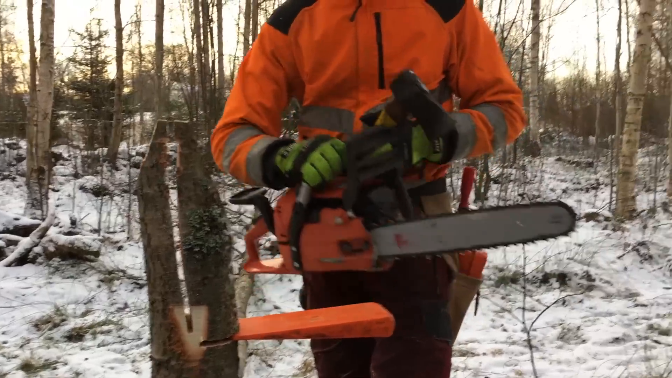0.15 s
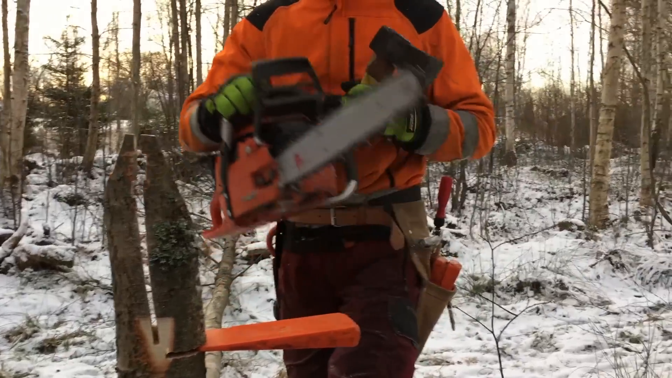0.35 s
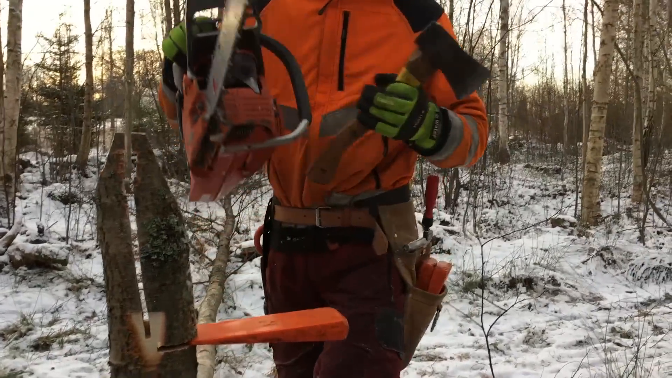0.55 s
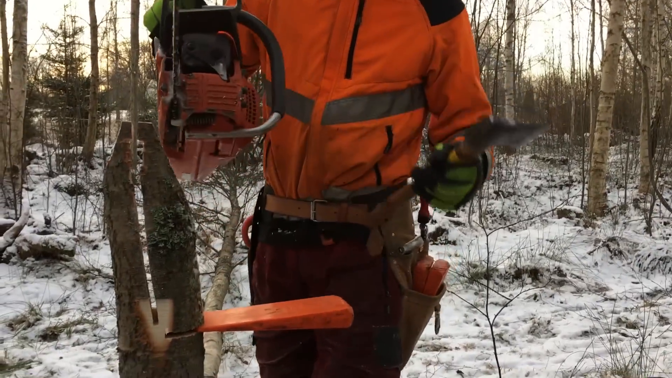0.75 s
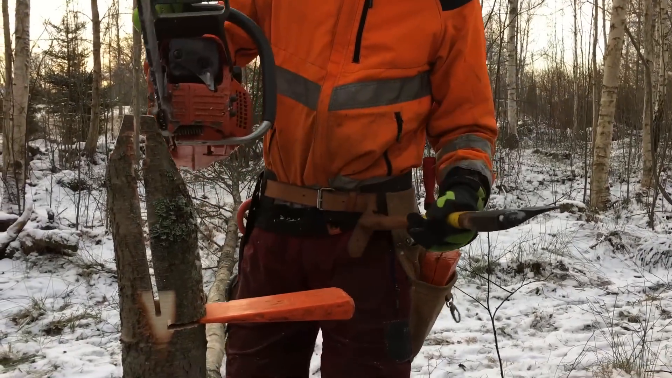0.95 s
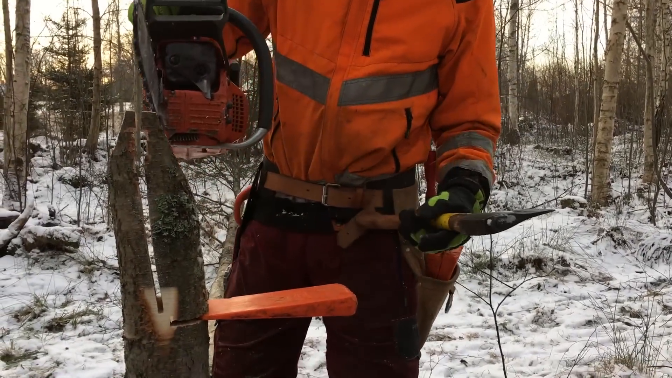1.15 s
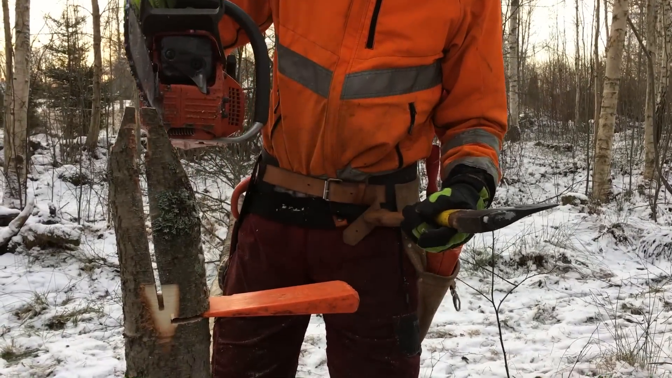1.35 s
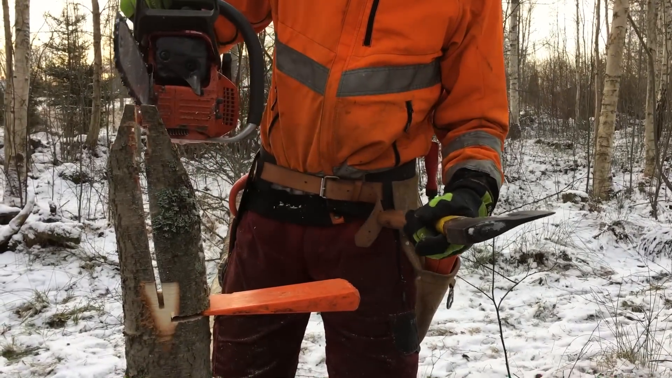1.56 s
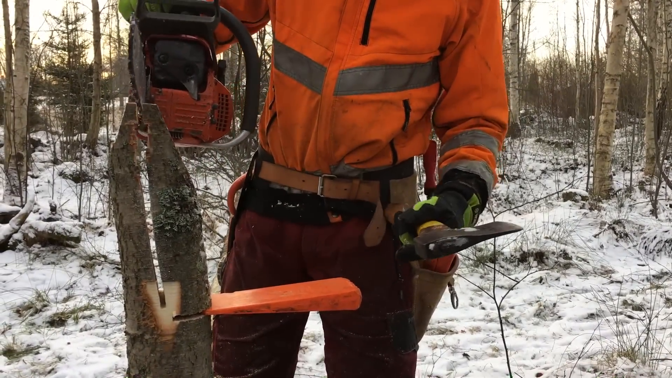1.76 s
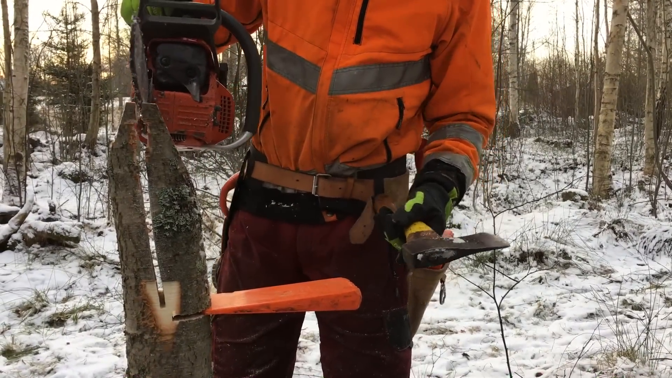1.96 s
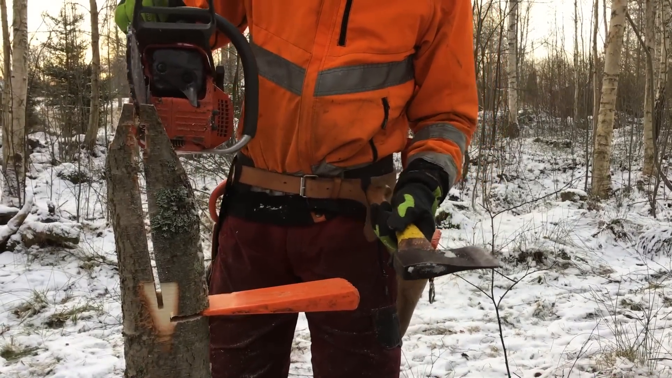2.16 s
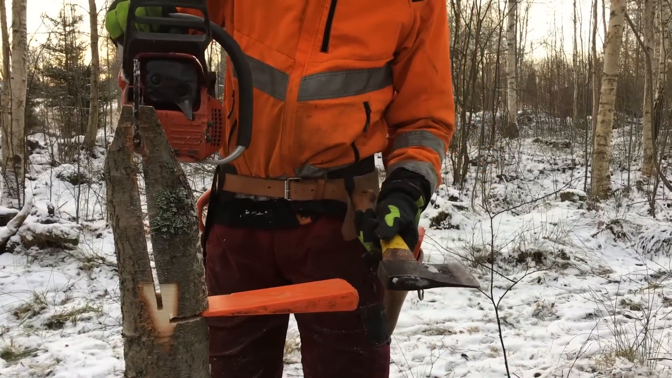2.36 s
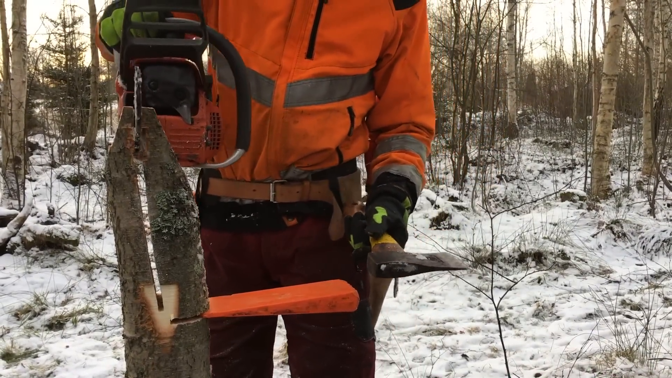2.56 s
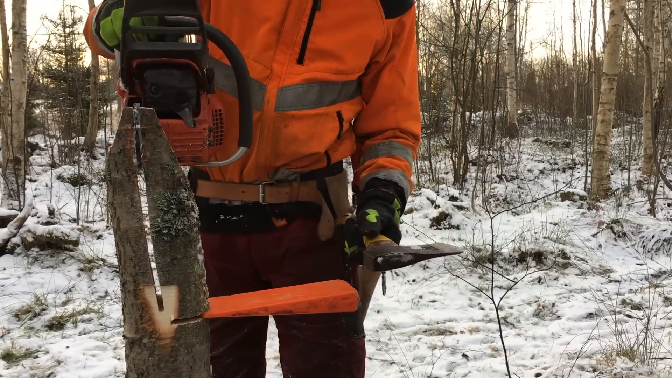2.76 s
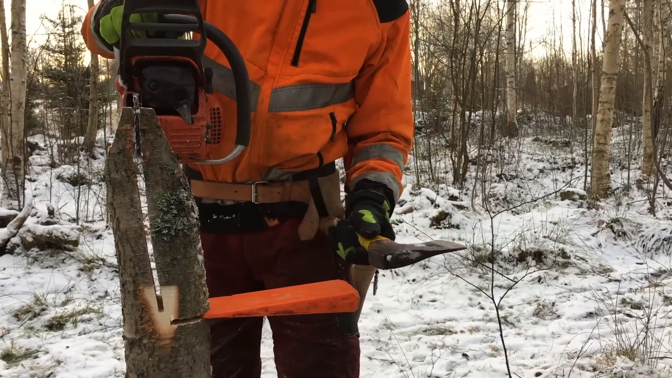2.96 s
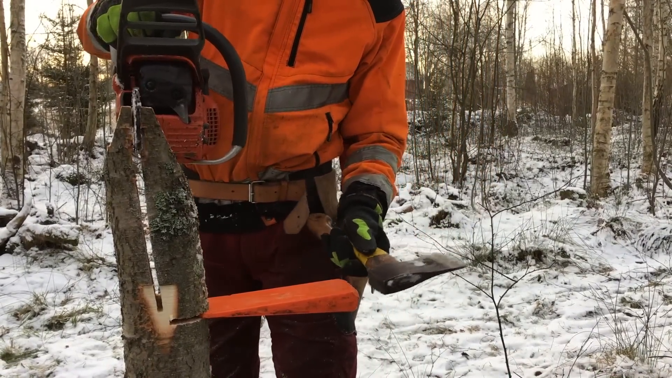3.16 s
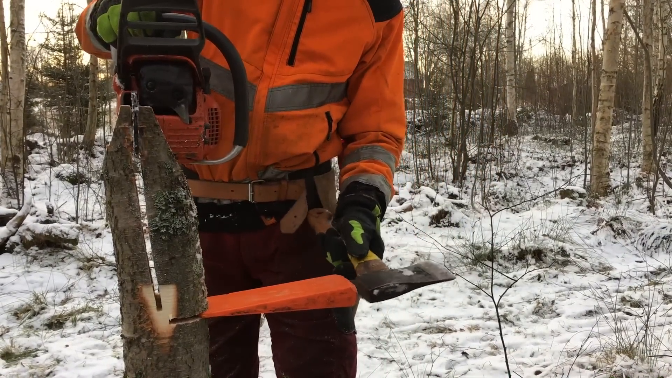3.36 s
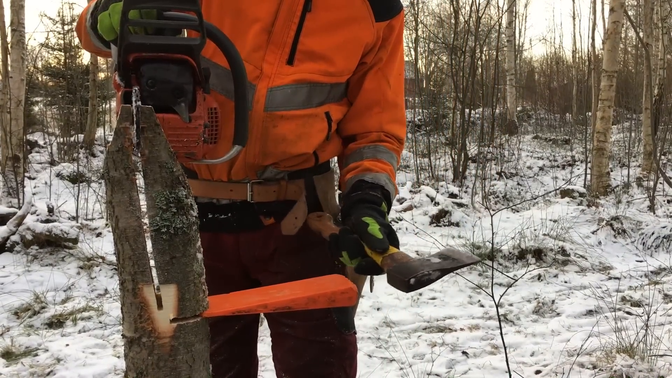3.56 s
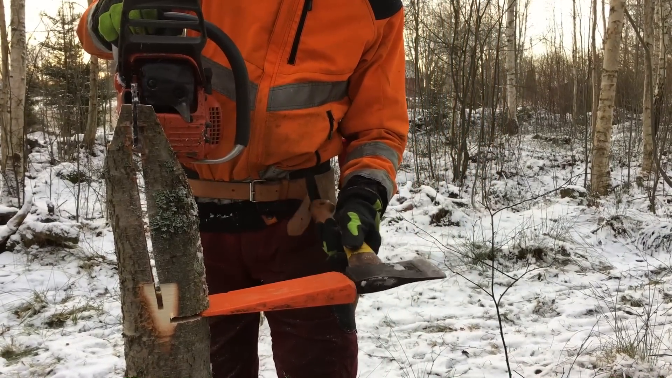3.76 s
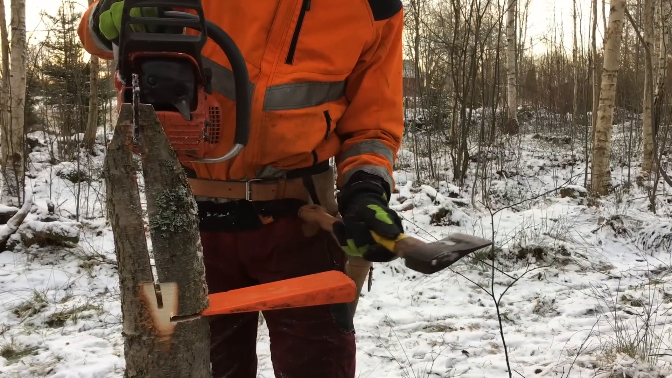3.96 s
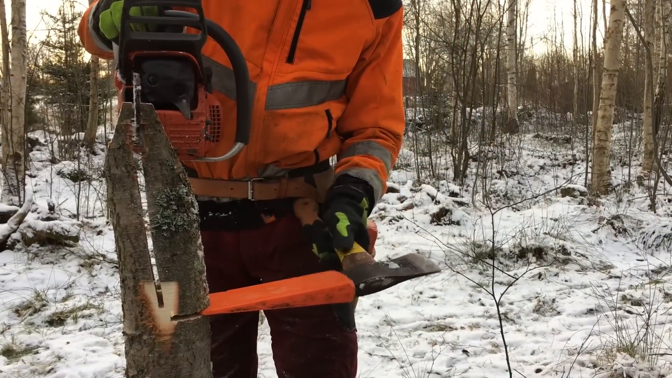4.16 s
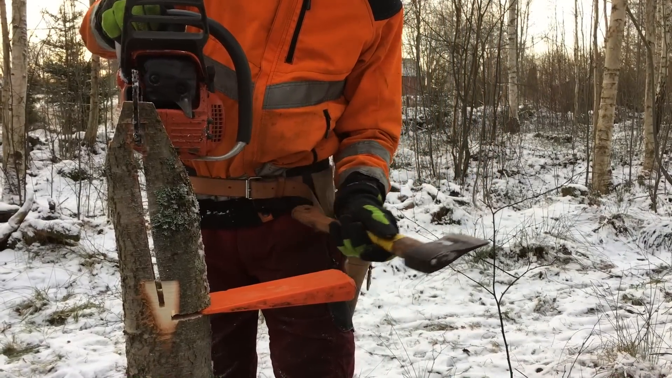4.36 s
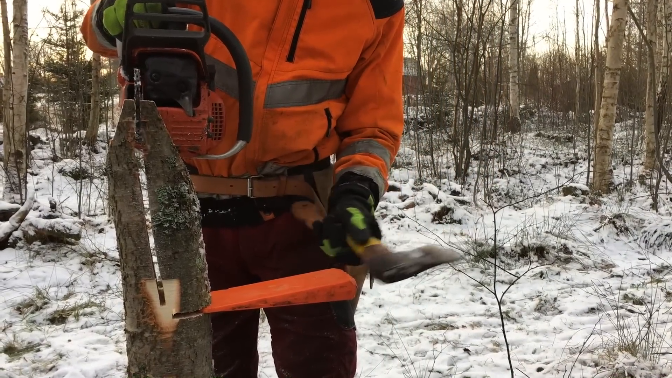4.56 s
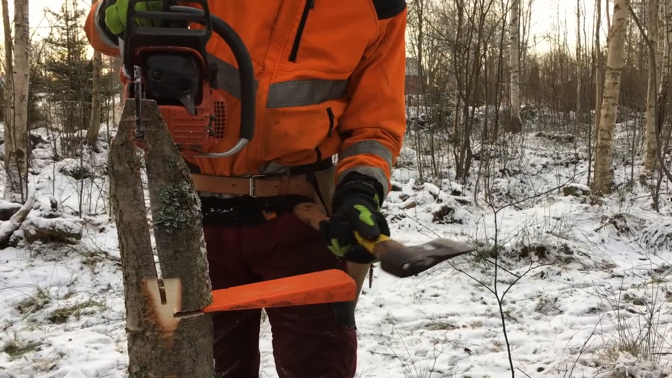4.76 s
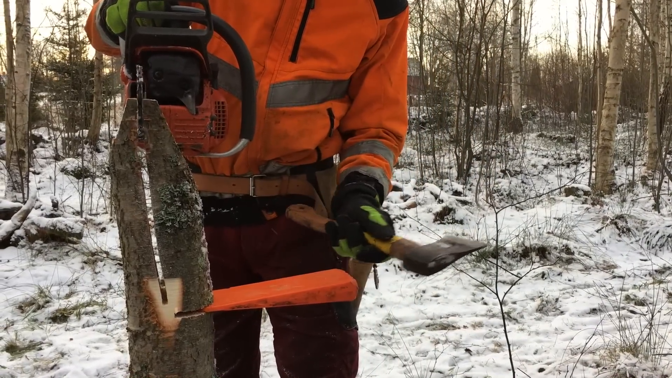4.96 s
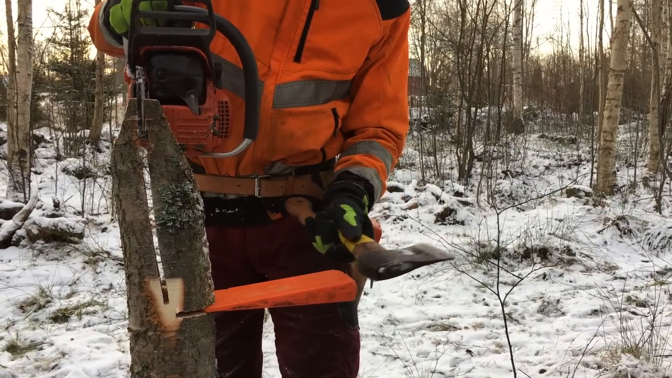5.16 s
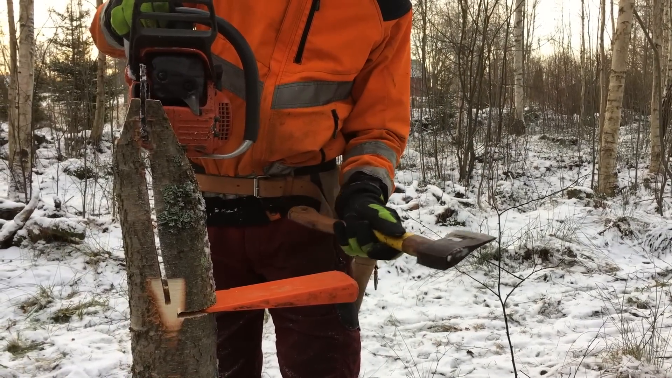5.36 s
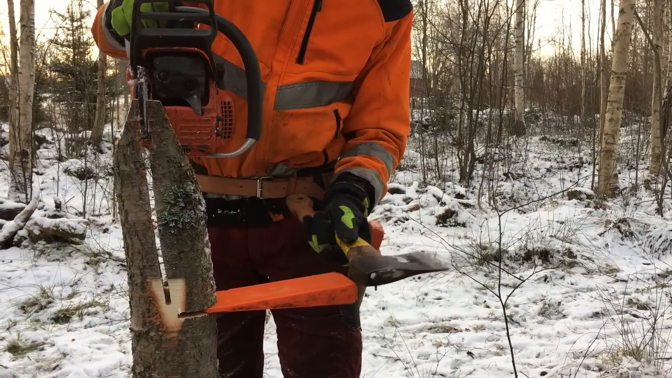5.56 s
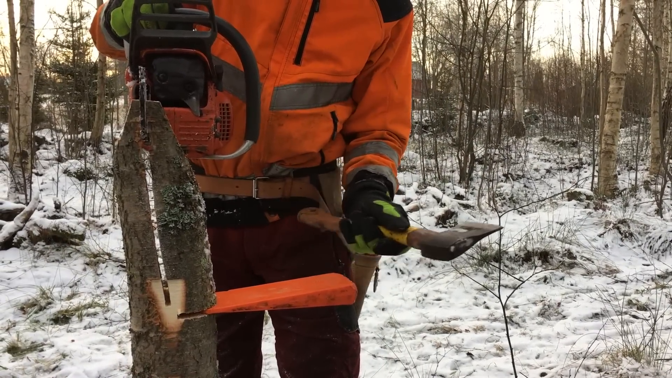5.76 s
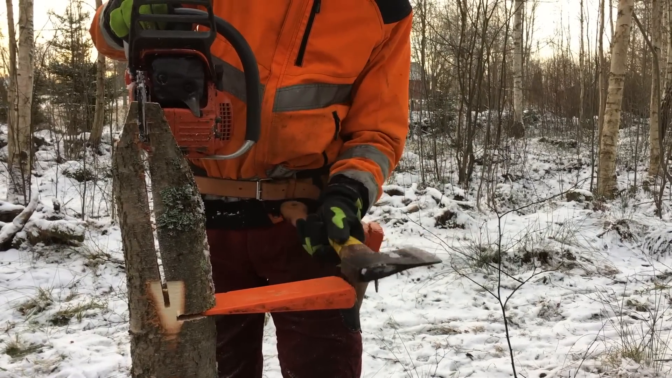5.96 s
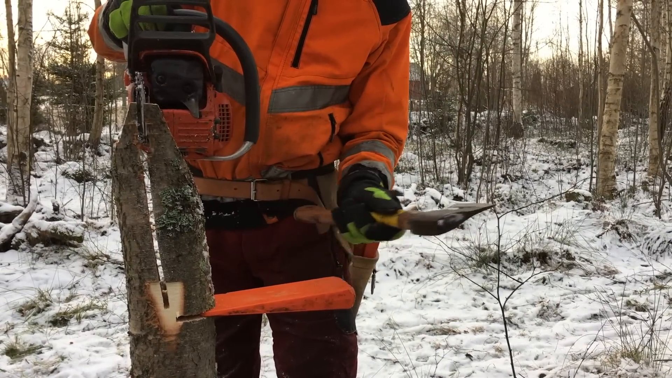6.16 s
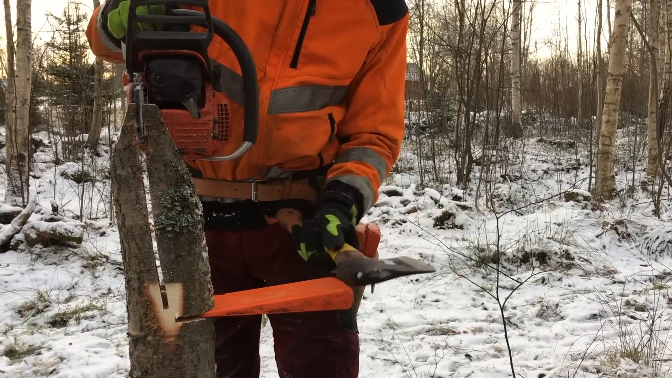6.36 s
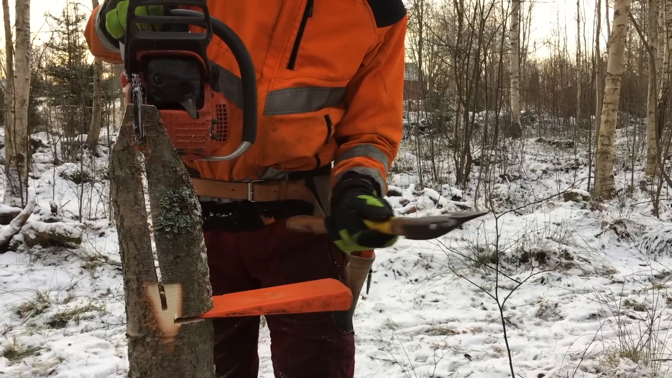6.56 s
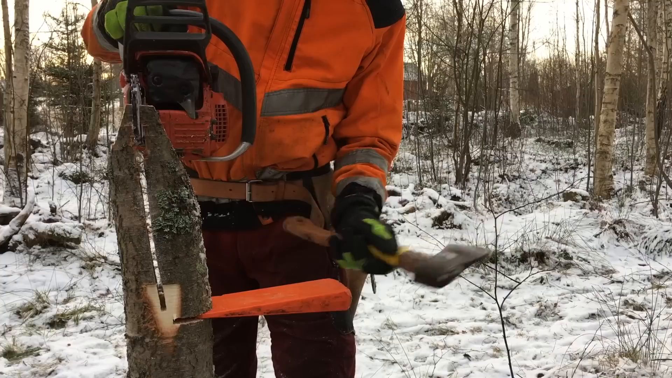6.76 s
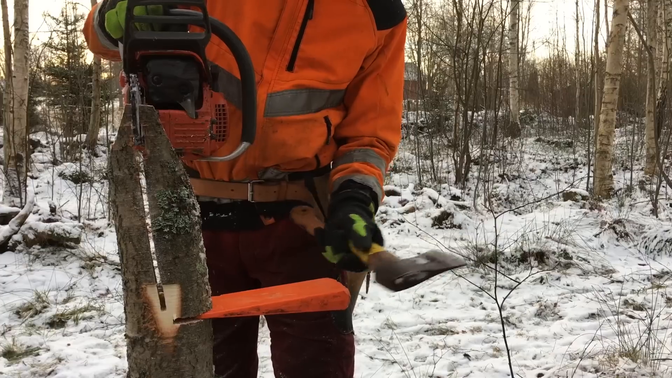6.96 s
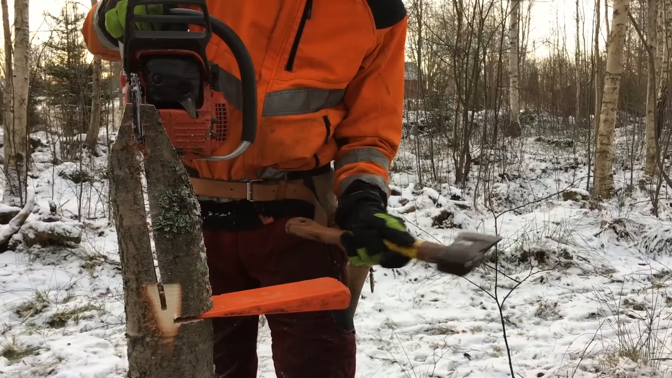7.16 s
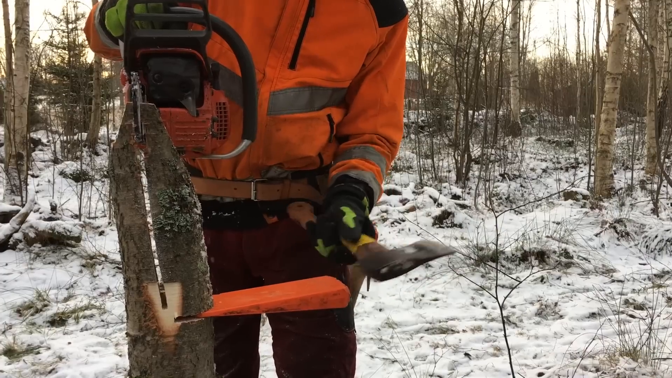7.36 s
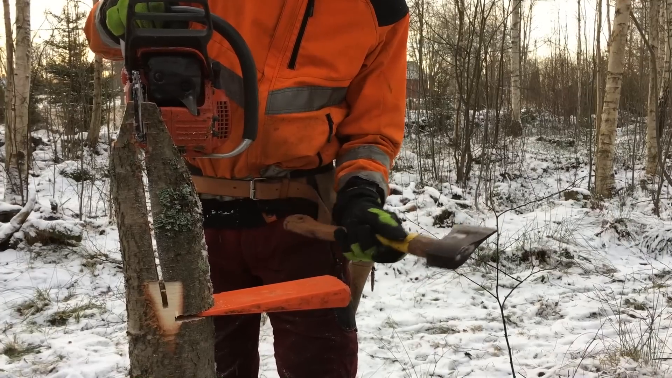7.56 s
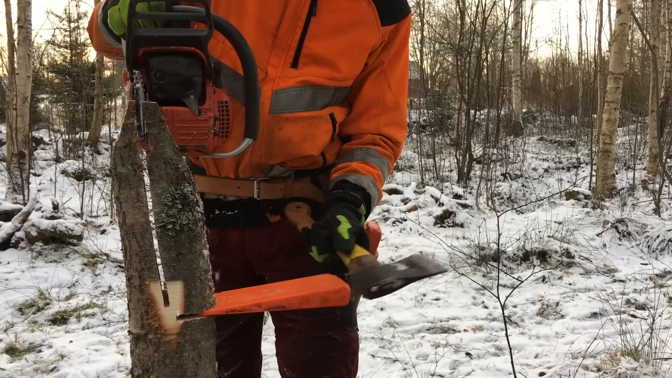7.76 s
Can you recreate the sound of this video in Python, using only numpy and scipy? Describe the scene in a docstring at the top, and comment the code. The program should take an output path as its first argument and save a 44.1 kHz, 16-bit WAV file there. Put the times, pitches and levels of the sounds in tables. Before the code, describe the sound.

Over faint rumble and air hiss, stiff cloth rustles and tools clatter, then settle into small ticks and soft low bumps. Steady hammering follows: eleven dry, bright knocks of steel on a plastic wedge, each with a choked knocky ring, woody body, low thump and quick echo off the trees. Blows grow stronger, with small rebound clicks between; the nearby microphone clips on the hardest.

```python
"""Blow after blow, the back of an axe drives a plastic wedge into a split trunk in a snowy forest: decaying
modes of wedge, wood and steel, a crack of shaped noise, a low bloom and a late ground thump.
Echoes off the trees are banded decaying noise; the hardest blows overload the input and clip.
Before that a worker shifts a silent chainsaw and an axe: clacks are damped modes, gear ticks are resonant
noise bursts, the jacket rustles as grainy filtered noise, all over a faint rumble and hiss of air."""
import sys
import numpy as np
from scipy import signal
from scipy.fft import rfft, irfft
from scipy.io import wavfile
from scipy.ndimage import uniform_filter1d

SR = 44100
rng = np.random.default_rng(int(sys.argv[2]) if len(sys.argv) > 2 else 0)


def wav_record(signal):
    """Record a signal, one row per channel, as 16-bit PCM in the file named by sys.argv[1]."""
    frames = np.transpose(np.atleast_2d(signal))
    bounded = np.clip(frames, -1, 1)
    # unit amplitude maps onto the largest positive 16-bit level
    quanta = np.round(bounded * 32767).astype(np.int16)
    wavfile.write(sys.argv[1], SR, quanta)


N = 344421

# axe on wedge: (time [s], force [dB], wedge pitch [Hz], its ring [dB], second wedge pitch [Hz], its ring [dB],
#                ring choked after [s], trunk ring [dB], low bloom [dB], bloom pitch [Hz], ground thump [dB],
#                saw bar ring [dB])
BLOWS = [(3.333, -15, 1192, -10, 1470, -6.5, 0.011, -12.5, -27.5, 343, -16.5, -57),
         (3.809, -10, 1440, -4, 1257, -13, 0.013, -10.5, -26, 284, -13, -62),
         (4.25, -5.5, 1430, 3, 1170, -1.5, 0.0066, -1.5, -22, 179.8, -9.5, -60),
         (4.699, -3.5, 1236, -10, 1548, -3, 0.01, -6, -22.5, 292, -9.5, -60),
         (5.14, -3.5, 1360, 5, 1560, -11, 0.0077, -14.5, -21, 304, -6, -37),
         (5.579, -1, 1477, 5, 1328, 6.5, 0.012, -10, -21, 308, -10.5, -58),
         (6.006, 1.5, 1478, 4.5, 1325, 0.5, 0.0085, -10.5, -15.5, 269, -16, -32.5),
         (6.46, -1.5, 1534, 6.5, 1406, 2, 0.02, -3, -19.5, 259, -12, -39),
         (6.94, 2.5, 1360, -1, 1574, -2.5, 0.015, -2, -20.5, 160, -14, -34.5),
         (7.358, 4.5, 1616, -3.5, 1445, 0.5, 0.017, 1.5, -22.5, 150, -14, -28.5),
         (7.766, 3.5, 1140, 5, 1302, 4, 0.005, 1, -17.5, 155, -17, -40)]
# movement of the jacket, as its crisp rustle: (time [s], level [dB])
RUSTLE = [(0, -51.5), (.134, -67.5), (.372, -49), (.6, -56.5), (.62, -47.5), (.77, -43), (.79, -51.5),
          (.97, -54.5), (1.15, -49.5), (1.3, -54.5), (1.41, -61), (1.73, -67), (1.95, -62), (2.01, -53.5),
          (2.19, -48.5), (2.63, -53), (2.78, -55.5), (2.89, -64.5), (3.3, -65.5), (3.7, -73), (4.0, -60.5),
          (7.8, -59.5)]
# soft low noise of bloom and cloth bumps: (frequency [Hz], relative spectrum level [dB])
LOW_SPECTRUM = [(70, -13), (130, -3.5), (200, 5.5), (330, 1), (480, -11), (800, -67)]
BITE_S = 5.0   # from here the wedge bites


def from_db(db):
    """Amplitude ratio of a level: 20 dB per factor of ten."""
    return 10 ** (np.asarray(db) / 20)


def rms_one(x):
    """Normalises the effective (root mean square) value to 1."""
    return x / np.sqrt(np.mean(x ** 2) + 1e-20)


def at_hz(table, hz, column=1):
    """Interpolates a table column along logarithmic frequency, the scale of musical pitch."""
    table = np.array(table)
    return np.interp(np.log(hz), np.log(table[:, 0]), table[:, column])


def coloured(x, spectrum):
    """Linear filtering: multiplies the spectrum of x by a response, then sets rms 1."""
    hz = np.maximum(np.fft.rfftfreq(len(x), 1 / SR), 1)
    return rms_one(irfft(rfft(x) * from_db(at_hz(spectrum, hz)), len(x)))


def drift(rate_hz):
    """Slow random modulation: straight lines between Gaussian knots, two per period; rms 1."""
    position = np.arange(N) / SR * rate_hz * 2
    knots = np.arange(int(N / SR * rate_hz * 2) + 2)
    return rms_one(np.interp(position, knots, rng.standard_normal(len(knots))))


def fade(t, t60, rise):
    """Exponential build-up with time constant rise [s], and exponential damping by 60 dB in t60 [s]."""
    return (1 - np.exp(-t / rise)) * from_db(-60 * t / t60)


def follow(swing_db, level_db, share):
    """Power law: the gain is level_db where the swing is 0 dB and takes a share of its changes."""
    return from_db(level_db + share * swing_db)


def sine(t, hz):
    """Simple harmonic motion at a steady frequency."""
    return np.sin(2 * np.pi * hz * t)


def resonate(x, hz, width_hz):
    """Two-pole resonance of a given bandwidth, gain about 1 at its peak."""
    r = np.exp(-np.pi * width_hz / SR)
    gain = (1 - r * r) / 2
    return signal.lfilter([gain, 0, -gain], [1, -2 * r * np.cos(2 * np.pi * hz / SR), r * r], x)


def modes(t, table, rise):
    """Modal superposition: a sum of damped sines, each excited a little unevenly on every strike."""
    out = np.zeros(len(t))
    for hz, db, t60 in table:
        out += from_db(db + rng.normal(0, 1.3)) * fade(t, t60, rise) * sine(t, hz)
    return out


def add(out, s, sound):
    """Superposition: adds a sound starting at time s [s]."""
    at = round(s * SR)
    out[at:at + len(sound)] += sound[:N - at]


def air():
    """Broadband ambient noise: far rumble and hiss, wavering a little in level."""
    # (frequency [Hz], relative spectrum level [dB])
    air_spectrum = [(15, -2.5), (25, -27), (58, 3), (92, -5), (263, -16), (317, -11.5), (476, -16.5),
                    (575, -15.5), (936, -29.5), (1040, -94), (3920, -35), (6210, -40), (16000, -48)]
    return from_db(-53.5 + 1.5 * drift(21.0)) * coloured(rng.standard_normal(N), air_spectrum)


def scrape(noise):
    """Amplitude modulation: narrow-band noise rides on a sinking tone as a glove drags over the saw casing."""
    start_hz, sag_hz_per_s, width_hz = 1830, 710, 360
    level_db, hold_s, fall_db_per_s = -50, .14, 350
    t = np.arange(N) / SR
    rough = rms_one(signal.sosfilt(signal.butter(2, width_hz / 2, fs=SR, output="sos"), noise))
    # half the sag in the phase gives the full sag in frequency
    squeak = rough * np.sqrt(2) * sine(t, start_hz - sag_hz_per_s * t / 2)
    scrape_db = level_db - fall_db_per_s * np.maximum(t - hold_s, 0)
    return from_db(scrape_db + 1.8 * drift(32)) * squeak


def rustle():
    """Friction as dense random grains: a crisp coat surface, a duller fold, soft low bumps, one scrape."""
    # both: (frequency [Hz], relative spectrum level [dB])
    crisp_spectrum = [(1290, -7), (2200, -3), (3560, -1.5), (4960, -8), (5390, -5.5), (9330, -7.5),
                      (10300, -9.5), (14700, -9), (16000, -30.5)]
    dull_spectrum = [(350, -15), (700, 7.5), (1200, 6), (1900, 4.5), (2500, 4), (3300, -22), (5000, -23)]
    full_db, creases_per_s = -53.5, 60   # rustle level of a fully moving coat, and its crackle
    t = np.arange(N) / SR
    crisp_db = np.interp(t, *np.transpose(RUSTLE))
    force_db = np.interp(t, *np.transpose(BLOWS)[:2], left=-100)
    motion_db = crisp_db - full_db

    grain_db = 1.7 * np.minimum(rng.exponential(1, (3, N)), 5)
    grains = rng.standard_normal((3, N)) * from_db(grain_db)
    # each crease lifts the surface and fold grains for 60 samples
    crease_rate = creases_per_s * np.minimum(from_db(motion_db) ** 2, 1)
    creases = 1.0 * (rng.random((2, N)) < crease_rate / SR)
    grains[:2] *= 1 + 1.15 * uniform_filter1d(creases, size=60) * 60

    crisp = from_db(crisp_db + 1.6 * drift(70)) * coloured(grains[0], crisp_spectrum)
    # the swinging arm rubs harder as the blows grow
    sleeve = follow(force_db, level_db=-59.5, share=1)
    fold = np.hypot(follow(motion_db, level_db=-56.5, share=0.36), sleeve)
    dull = fold * from_db(2.15 * drift(23)) * coloured(grains[1], dull_spectrum)
    bumps = follow(motion_db, level_db=-58, share=0.48) * from_db(3.5 * drift(18))
    low = bumps * coloured(grains[2], LOW_SPECTRUM)
    return crisp + dull + low + scrape(grains[2])


def faint_ticks(count):
    """Random point process: small ticks, likelier and louder where the jacket rustles most."""
    when, size, pitch = rng.random((count, 3)).T
    rustle_db = np.interp(np.arange(N) / SR, *np.transpose(RUSTLE))
    energy = np.cumsum(from_db(rustle_db) ** 2)
    at = np.searchsorted(energy, when * energy[-1])
    level_db = rustle_db[at] + 17.5 + 8 * (size - .5)
    return list(zip(at / SR, level_db, 900 * 4 ** pitch, np.full(count, -18.5)))


def ticks():
    """Impulsive excitation: a dry noise burst in a broad resonance, with a bright snap on top."""
    # gear and bark, and ticks just before some late blows: (time [s], level [dB], centre [Hz], snap relative to
    # that level [dB])
    small_ticks = [(0.0766, -25.5, 2400, -16), (0.1123, -24.5, 3840, -6), (0.48, -28, 4120, -11),
                   (0.5267, -16, 1320, -23), (0.6453, -31, 3910, 0), (0.7038, -11.5, 4030, -13),
                   (0.7162, -27, 2320, -18), (0.7863, -18, 3180, -20), (0.798, -17, 2940, -20),
                   (0.819, -15, 985, -23), (0.8362, -11, 2850, -22), (0.905, -27, 3780, -5),
                   (0.9358, -26.5, 910, -27), (0.9482, -28, 940, -30), (1.0216, -21.5, 740, -16),
                   (1.2762, -28.5, 1050, -7), (1.705, -31.5, 1260, -28), (2.0133, -30, 1280, -8),
                   (2.134, -31.5, 1330, -7), (2.1983, -26, 1110, -7), (2.2998, -18, 2870, -1.5),
                   (2.4957, -22, 2160, -10.5), (3.047, -27, 1140, -20), (2.6726, -38, 6000, -5),
                   (2.866, -38, 4500, -10), (3.0036, -42.5, 3000, -17), (3.1193, -38.5, 2600, -20),
                   (5.9, -33, 1950, -3.5), (6.916, -33, 2000, -16), (6.933, -19, 1095, -35),
                   (7.337, -30.5, 2500, -7), (7.744, -25, 1230, -28)]
    # the wedge rebounds in the split after a blow: (time [s], level [dB])
    rebounds = [(3.354, -28), (4.2847, -22), (4.3254, -25.5), (4.345, -38), (4.7353, -15.5), (4.7503, -28),
                (4.7724, -21), (5.2102, -15), (5.2492, -34.5), (5.608, -18), (5.6244, -22), (5.686, -21.5),
                (6.106, -28), (6.4844, -7.5), (6.9627, -9), (7.0194, -26), (7.487, -24)]
    rebound_hz, rebound_snap_db = 2340, -25
    rows = small_ticks + [(s, db, rebound_hz, rebound_snap_db) for s, db in rebounds]
    rows = rows + faint_ticks(count=45)
    out, t = np.zeros(N), np.arange(SR // 20) / SR
    shape = fade(t, 0.006, 0.000067) + from_db(-13.5) * fade(t, 0.093, 0.00033)
    for s, db, hz, snap_db in rows:
        burst = rng.standard_normal(len(t)) * shape
        # the root makes up for the narrower band of low ticks
        body = resonate(burst, hz, 0.52 * hz) * np.sqrt(SR / hz / 6)
        snap = from_db(snap_db) * np.diff(burst, prepend=0)
        add(out, s, from_db(db) * (body + snap))
    return out


def saw_hum():
    """Sympathetic vibration: after a blow the bar in the cut and the body of the saw hum on."""
    # the bar is tighter as the wedge bites
    bar_hz, bar_rise_hz_per_s = 253, 15.4
    body_hz, body_db, body_rise_db_per_s = 97.5, -38, 2.5
    out, t = np.zeros(N), np.arange(SR // 2) / SR
    body_shape = fade(t, 0.36, 0.01) + from_db(9.5) * fade(t, 0.35, 0.029)
    for s, *_, bar_db in BLOWS:
        since_bite_s = s - BITE_S
        bar = fade(t, 0.51, 0.034) * sine(t, bar_hz + bar_rise_hz_per_s * since_bite_s)
        add(out, s, from_db(bar_db) * bar)
        if since_bite_s > 0:
            body_gain = from_db(body_db + body_rise_db_per_s * since_bite_s)
            add(out, s, body_gain * body_shape * sine(t, body_hz))
    return out


def saw_clacks():
    """Modal excitation: the hard parts of the moved saw ring, most strongly near one pitch of each clack."""
    # (time [s], level [dB], strongest near [Hz])
    clacks = [(0.528, -5.5, 1290), (0.721, -29, 230), (.83, -19, 900), (0.839, -10.5, 3030),
              (0.961, -25.5, 220), (1.021, -28, 278), (1.708, -25.5, 218), (2.15, -26, 200),
              (2.755, -23, 245), (3.049, -18.5, 245)]
    # hard parts of the saw: (frequency [Hz], level before the fall away from the clack's pitch [dB], t60 [s])
    casing = [(142, -12, 0.057), (245, -13, 0.048), (760, -3, 0.016), (904, -11, 0.027),
              (1290, -18.5, 0.085), (2250, -6, 0.016), (2670, -8, 0.024), (2990, 1.5, 0.0058),
              (3640, -4.5, 0.015)]
    fall_db_per_octave = 9.5
    out, t = np.zeros(N), np.arange(SR // 2) / SR
    for s, db, near_hz in clacks:
        struck = []
        for hz, mode_db, t60 in casing:
            octaves = abs(np.log2(hz / near_hz))
            struck.append((hz, mode_db - fall_db_per_octave * octaves, t60))
        add(out, s, from_db(db) * modes(t, struck, 0.00013))
    return out


def forest():
    """Diffuse scattering: echoes off many trunks blur into lumpy noise that dies band by band."""
    # near trunks: (frequency [Hz], relative band level [dB], t60 [s])
    scatter = [(300, -7, 0.11), (830, 5, 0.16), (1360, -7.5, 0.27), (1820, 7.5, 0.09), (3620, -13, 0.21),
               (6760, -23.5, 0.2), (11760, -28, 0.16)]
    out, t = np.zeros(N), np.arange(SR) / SR
    edges = 200 * 2 ** np.arange(0, 6.6, .5)   # half-octave bands [Hz]
    white, lumps = rng.standard_normal((2, N)), from_db(3.06 * drift(45))
    for k, (low, high) in enumerate(zip(edges, edges[1:])):
        band_filter = signal.butter(2, [low, high], "band", fs=SR, output="sos")
        band = signal.sosfilt(band_filter, white[k % 2])
        hz, level = np.sqrt(low * high), np.zeros(N)
        t60 = at_hz(scatter, hz, column=2)
        band_gain = from_db(at_hz(scatter, hz))
        near, far = fade(t, t60, 0.00088), fade(t, 6.07 * t60, 0.025)
        for s, force_db, *_ in BLOWS:
            near_echo = follow(force_db, level_db=-11.5, share=0.81) * near
            # the far wood answers the hard blows most
            far_echo = follow(force_db, level_db=-33, share=1.33) * far
            add(level, s, band_gain * (near_echo + far_echo))
        out += level * band
    wedge_tone = resonate(resonate(out, 1200, 450), 1380, 450)   # carries furthest
    return (out + from_db(5.5) * wedge_tone) * lumps


def ground_thump(t, s, thump_db):
    """Low-frequency ground vibration: a swelling tone, its lowest part last; higher and quicker after the bite."""
    bitten_s = max(s - BITE_S, 0)
    thump_hz = 76.3 + 7.1 * bitten_s
    swell_s = 0.031 / (1 + 0.33 * bitten_s)
    thump = fade(t, 0.14, swell_s) * sine(t, thump_hz)
    lowest = from_db(-16.0) * fade(t, 0.49, 0.089) * sine(t, 47)
    return from_db(thump_db) * (thump + lowest)


def low_bloom(t, bloom_db, bloom_hz):
    """Damped low resonance: hollow noise and a quickly dying tone swell together."""
    noise = from_db(0.5) * coloured(rng.standard_normal(len(t)), LOW_SPECTRUM)
    tone = from_db(3.5 - 230 * t) * sine(t, bloom_hz)
    return from_db(bloom_db) * fade(t, 0.18, 0.0053) * (noise + tone)


def crack(t, force_db):
    """Impact and fracture: steel on plastic snaps, fibres and bark crackle on, the axe head rings."""
    # (frequency [Hz], relative spectrum level [dB])
    crack_spectrum = [(1060, -68), (1800, -15.5), (2920, -12.5), (4490, -11), (5150, -18.5), (6960, -12.5),
                      (7630, -21), (8590, -10.5), (16000, -38.5)]
    # steel of the axe head: (frequency [Hz], relative level [dB], t60 [s])
    axe_modes = [(2095, -1.5, 0.027), (2462, 2.5, 0.022), (2827, -9.5, 0.059), (3134, -9.5, 0.041),
                 (3467, -7.5, 0.036), (3880, -10.5, 0.053), (4470, 2.5, 0.025), (6220, -3, 0.021),
                 (8660, -42, 0.0096)]
    shape = fade(t, 0.0073, .0001) + from_db(-21.0) * fade(t, 0.06, 0.00063)
    # level varies at random over some 40 samples
    splinter_db = 3.5 * np.sqrt(40) * uniform_filter1d(rng.standard_normal(len(t)), size=40)
    grit = rng.standard_normal(len(t)) * from_db(splinter_db)
    steel = from_db(-10.5) * modes(t, axe_modes, 0.0036)
    return follow(force_db, level_db=5, share=0.82) * (shape * coloured(grit, crack_spectrum) + steel)


def trunk(t, wood_db):
    """Modal vibration of the trunk under the wedge, heavily damped."""
    # (frequency [Hz], relative level [dB], t60 [s])
    trunk_modes = [(693, -7, 0.033), (747, -6.5, 0.03), (823.6, 0.5, 0.029)]
    return from_db(wood_db) * modes(t, trunk_modes, 0.0026)


def wedge(t, force_db, main_tones, choke_s):
    """Modal vibration with growing damping: the wood closes on the wedge and chokes its ring."""
    # fainter modes gripped in the wood: (frequency [Hz], level at 0 dB force [dB], share of force, t60 [s])
    side_modes = [(1195, -13, .5, 0.043), (1264, -4.5, 0.83, 0.061), (1624, -11, 0.4, 0.089)]
    tones = [(hz, db, 0.069) for hz, db in main_tones]
    tones += [(hz, db + share * force_db, t60) for hz, db, share, t60 in side_modes]
    return modes(t, tones, 0.0018) * np.exp(-(t / choke_s) ** 2)


def blows():
    """Superposed impact responses of wedge, trunk and axe, with the ground thump arriving late."""
    thump_lag_s = 0.01105
    out, t = np.zeros(N), np.arange(SR // 2) / SR
    for row in BLOWS:
        s, force_db, hz, ring_db, second_hz, second_db, choke_s = row[:7]
        wood_db, bloom_db, bloom_hz, thump_db = row[7:11]
        add(out, s, wedge(t, force_db, [(hz, ring_db), (second_hz, second_db)], choke_s))
        add(out, s, trunk(t, wood_db))
        add(out, s, crack(t, force_db))
        add(out, s, low_bloom(t, bloom_db, bloom_hz))
        add(out, s + thump_lag_s, ground_thump(t, s, thump_db))
    return out


def scene():
    """Linear superposition of all sources, as one channel."""
    return (air() + rustle() + ticks() + saw_hum() + saw_clacks() + forest() + blows())[None]


def record(dry):
    """Hard clipping cuts overloading peaks flat; an elliptic low-pass then removes the top of the band."""
    cutoff_hz = 15800
    lowpass = signal.ellip(10, .5, 60, cutoff_hz, fs=SR, output="sos")
    return signal.sosfilt(lowpass, np.clip(dry, -.97, .97))


dry = scene()
out = record(dry)
wav_record(out)
```